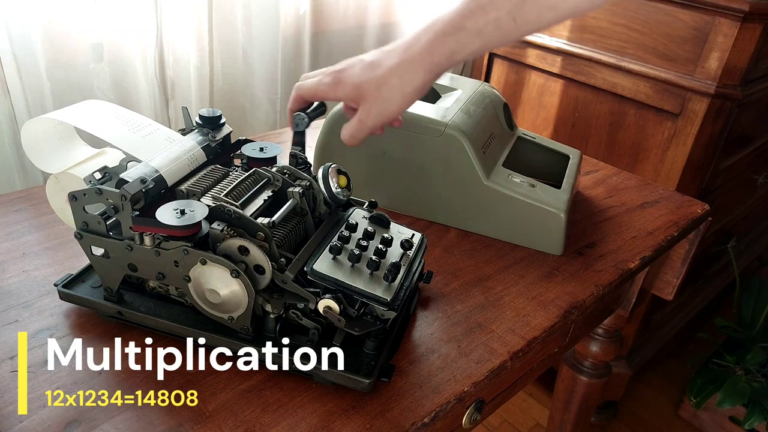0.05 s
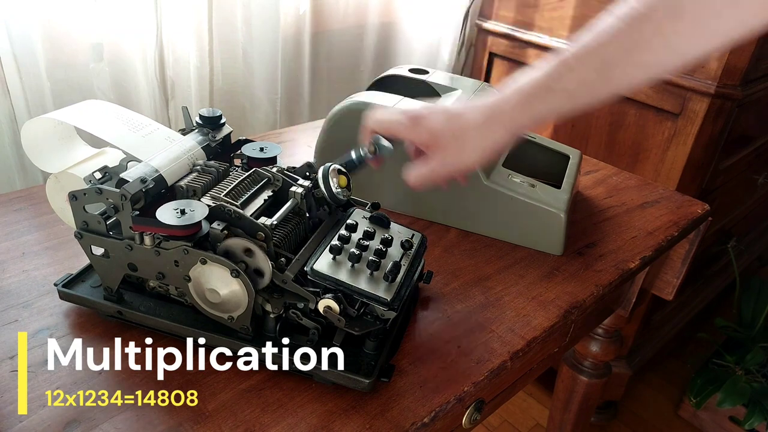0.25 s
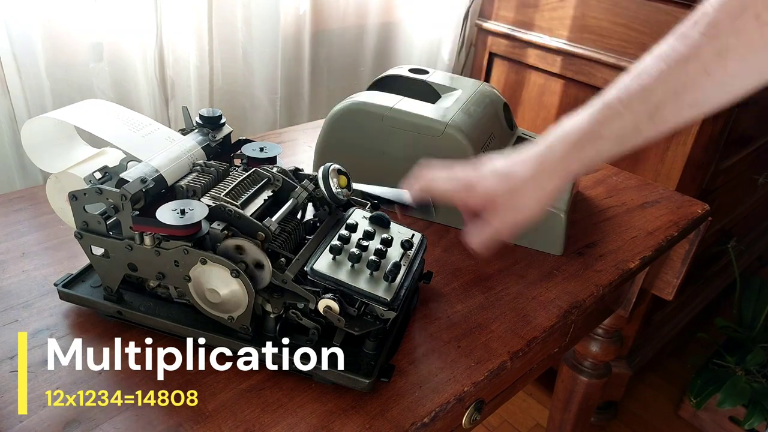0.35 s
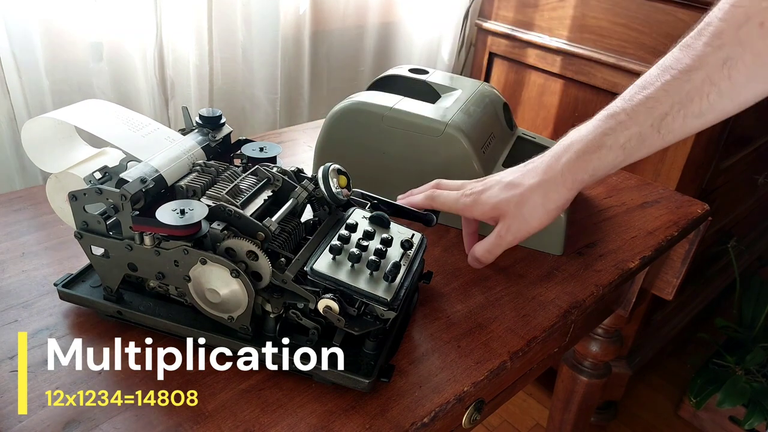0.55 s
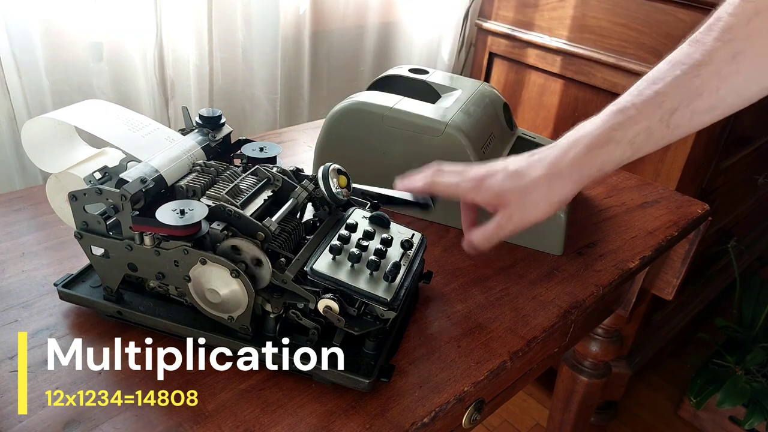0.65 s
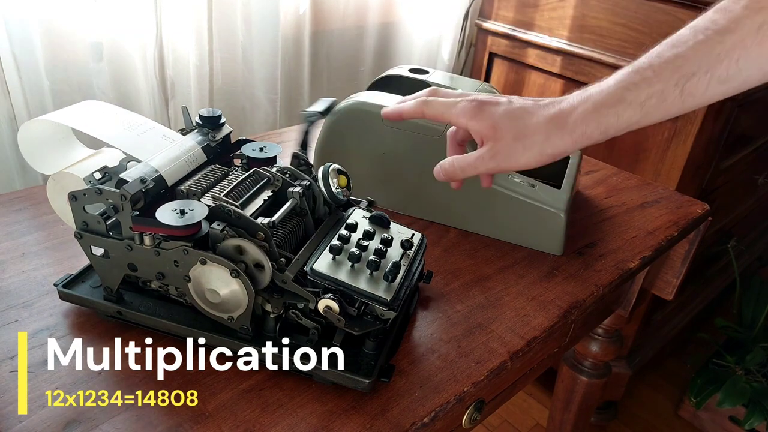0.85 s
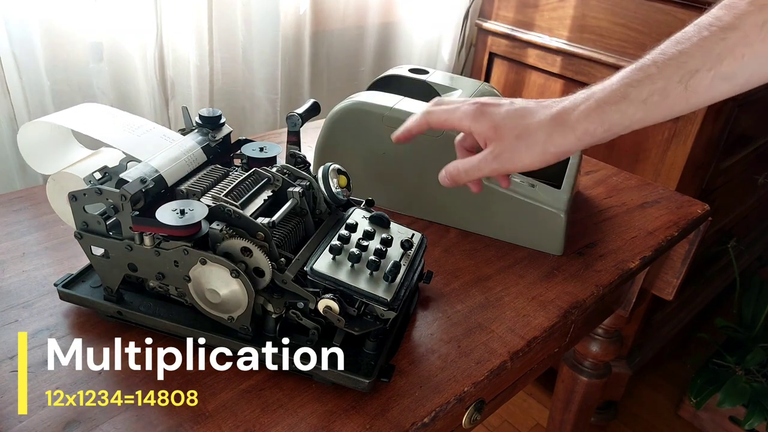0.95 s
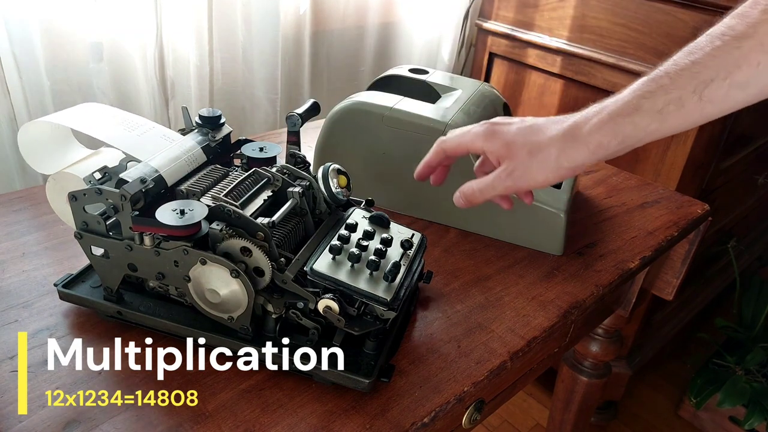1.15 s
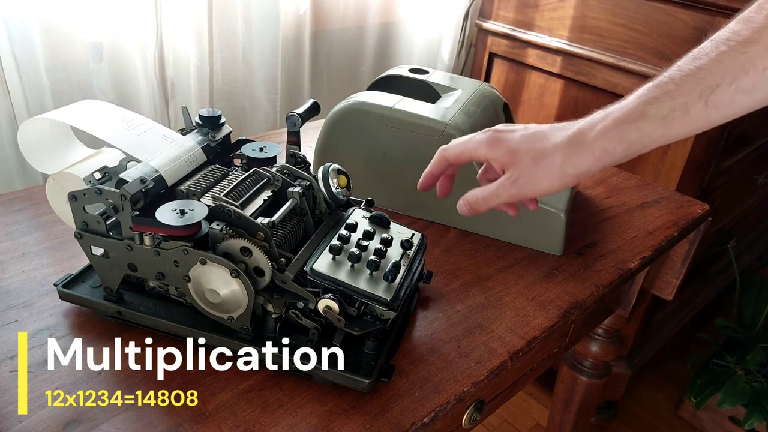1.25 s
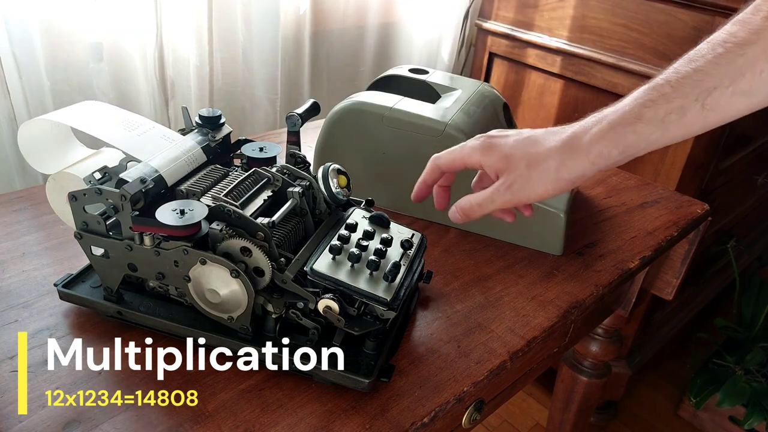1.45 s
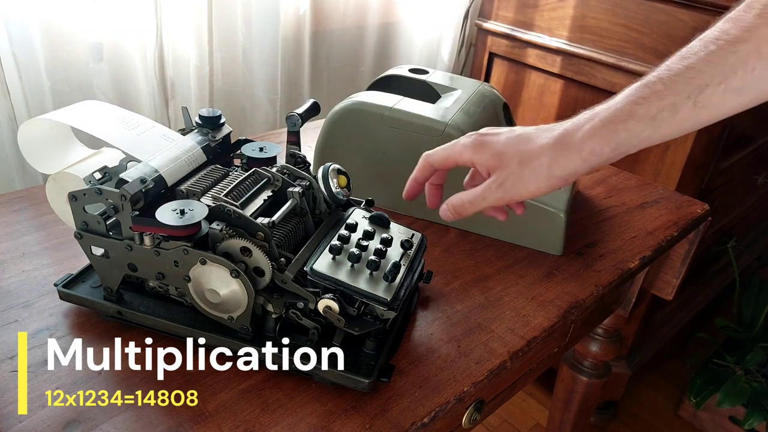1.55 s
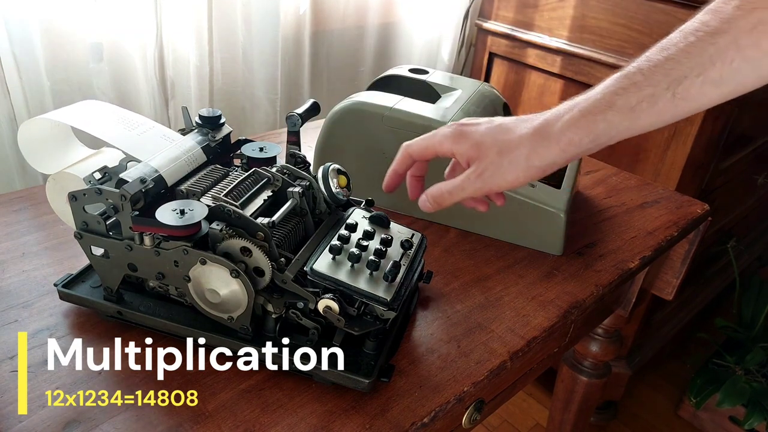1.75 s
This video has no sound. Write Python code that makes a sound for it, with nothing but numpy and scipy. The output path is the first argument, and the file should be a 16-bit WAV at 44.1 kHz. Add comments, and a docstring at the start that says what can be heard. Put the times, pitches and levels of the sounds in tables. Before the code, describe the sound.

A mechanical calculator, slightly left in a small room, ratchets loudly from about 0.2 seconds as its lever is pulled, gears rattling until a steel clunk thumps the wooden table near 0.5 seconds. From 0.75 seconds the lever springs back with more clicking and clatter, knocking home around 1 second. A spring quivers faintly after each stroke, and only quiet room hiss remains from about 1.5 seconds.

```python
"""A pawl clicks over its ratchet as the lever of an uncovered mechanical calculator is pulled to its stop
and springs back. Racks and gears rattle, links clack, steel parts knock home and thump the table.
After each stroke a spring quivers faintly over the quiet hiss of the room.
The machine stands on a wooden table in a small room, a little left of a stereo microphone pair."""
import sys
import numpy as np
from scipy import signal
from scipy.fft import rfft, irfft, next_fast_len
from scipy.io import wavfile

SR = 44100
rng = np.random.default_rng(int(sys.argv[2]) if len(sys.argv) > 2 else 0)


def log_audio(samples):
    """Write samples as a 16-bit WAV file to the path given in sys.argv[1]."""
    # one column per channel
    frames = np.atleast_2d(samples).T
    # limit to full scale, then quantise
    limited = np.clip(frames, -1, 1)
    pcm = np.round(limited * 32767).astype(np.int16)
    wavfile.write(sys.argv[1], SR, pcm)


N = 79380


def amp(db):
    """Decibels to gain."""
    return 10 ** (np.asarray(db) / 20)


def unit(x):
    """Scale to rms 1."""
    return x / np.sqrt(np.mean(x ** 2) + 1e-20)


def along(points, hz):
    """Read (Hz, value) points on a log frequency axis."""
    f, v = np.transpose(points)
    return np.interp(np.log(hz + 1), np.log(f + 1), v)


def bell(x, centre, width):
    """A Gaussian curve of height 1."""
    return np.exp(-.5 * ((x - centre) / width) ** 2)


def fade(t, t60):
    """Free decay, 60 dB down after t60 seconds."""
    return np.exp(-np.log(1000) * t / t60)


def filtered(x, response):
    """Filter x by a gain given as a function of Hz."""
    size = next_fast_len(x.shape[-1] + 8192)
    return irfft(rfft(x, size) * response(np.fft.rfftfreq(size, 1 / SR)), size)[..., :x.shape[-1]]


def add(out, start, sound):
    """Mix a sound in at start seconds."""
    part = out[:, max(0, round(start * SR)):][:, :sound.shape[-1]]
    part += sound[..., :part.shape[1]]


# Likeness of the two microphones. Each row: frequency in Hz, correlation.
MIC_LIKENESS = [(30, .3), (110, 1), (300, 0.73), (1000, .15), (3000, 0.14), (12000, 0.083)]
def paired(x):
    """Two unrelated signals as the microphone pair hears them: most alike in the bass."""
    def mid_side_gains(hz):
        angle = np.arccos(np.clip(along(MIC_LIKENESS, hz), -1, 1)) / 2
        return np.array([np.cos(angle), np.sin(angle)])
    mid, side = filtered(x, mid_side_gains)
    return np.array([mid + side, mid - side])


def coloured_noise(length, spectrum, envelope=1):
    """Stereo noise of rms 1, shaped by an envelope and then by a (Hz, dB) spectrum."""
    noise = paired(envelope * rng.standard_normal((2, length)))
    return unit(filtered(noise, lambda hz: amp(along(spectrum, hz))))


# Room tone around the microphones. Each row: frequency in Hz, relative level in dB.
AIR_SPECTRUM = [(25, -16), (48, -8), (120, -5), (165, -11), (330, -13.5), (480, -17), (700, -25.5),
                (900, -20.5), (1300, -28.5), (2000, -22.5), (3900, -44), (16000, -49)]
# A narrow hiss that swells and sinks. Each row: time in seconds, level in dB.
HISS_LEVELS = [(0, -64), (.2, -54.5), (.7, -60.5), (1.2, -69.5), (1.8, -67)]
# Steady tones in the room. Each row: frequency in Hz, level in dB.
ROOM_TONES = [(129, -76), (900, -88), (2476, -80)]
def background(air_db=-67.5, air_left_db=5.5, hiss_hz=2450, hiss_width_hz=303):
    """Quiet room noise, stronger on the left, with a band of hiss and three faint tones."""
    t = np.arange(N) / SR
    air = amp(air_db + air_left_db * np.array([[.5], [-.5]])) * coloured_noise(N, AIR_SPECTRUM)
    hiss = unit(filtered(rng.standard_normal((2, N)), lambda hz: bell(hz, hiss_hz, hiss_width_hz)))
    hiss *= amp(np.interp(t, *np.transpose(HISS_LEVELS)))
    tones = sum(amp(db) * np.sqrt(2) * np.sin(2 * np.pi * (hz * t + rng.random()))
                for hz, db in ROOM_TONES)
    return air + hiss + tones


# Decay of the small room. Each row: frequency in Hz, t60 in seconds.
ROOM_DECAY = [(80, .42), (250, .42), (600, .52), (1500, .42), (4000, .35), (9000, .3), (12500, .26),
              (16000, .19)]
# Reverberation at the microphones. Each row: frequency in Hz, gain in dB.
ROOM_GAIN = [(60, 9), (200, -1), (1000, -5.5), (4000, -4), (9000, -8), (14000, -4.5)]
def room(x, build_s=.0025):
    """Reflections off the nearby walls build quickly and die sooner in the treble."""
    hz, t, noise = signal.stft(paired(rng.standard_normal((2, SR * 3 // 4))), SR, nperseg=256)
    shape = fade(t, along(ROOM_DECAY, hz)[:, None]) * (1 - np.exp(-(t / build_s) ** 2))
    shape /= np.sqrt((shape ** 2).sum(1, keepdims=True) * t[1] * SR)  # equal energy in every band
    tail = signal.istft(noise * shape * amp(along(ROOM_GAIN, hz))[:, None], SR, nperseg=256)[1]
    return signal.fftconvolve(x, tail, axes=1)[:, :N]


# The spring after each stroke. Each row: time of the first pulse in seconds, level in dB.
SPRING_QUIVERS = [(0.654, -57), (1.108, -61.5)]
def spring(pulses=5, period_s=.086, width_s=.016, loss_db=1.6, hum_hz=630, width_hz=80):
    """A spring swings to and fro, humming in ever weaker pulses."""
    t = np.arange(N) / SR
    swell = sum(amp(db - loss_db * k) * bell(t, first + k * period_s, width_s)
                for first, db in SPRING_QUIVERS for k in range(pulses))
    hum = filtered(paired(rng.standard_normal((2, N))), lambda hz: bell(hz, hum_hz, width_hz))
    return swell * unit(hum)


# Modes of the table top and base plate. Each row: frequency in Hz, level in dB, t60 in seconds.
TABLE_MODES = [(176, -2, .22), (241, -7, .22), (297, 0, .22), (401, -2, .26), (440, -8, .26),
               (486, -10, .3), (602, -11, .28)]
def table_ring(t):
    """The wooden table rings in its modes after one push."""
    return sum(amp(db) * fade(t, t60) * np.sin(2 * np.pi * hz * t) for hz, db, t60 in TABLE_MODES)


# Weight shifting on the table. Each row: start in seconds, thud level in dB, table ring level in dB.
TABLE_THUMPS = [(0.277, -45, -41), (0.319, -60, -52.5), (0.456, -24.5, -45.5), (.487, -29.5, -42.5),
                (0.511, -52.5, -38), (.768, -39.5, -46), (.86, -43, -40.5), (.96, -53.5, -40),
                (0.999, -51, -54), (1.031, -40, -44)]
def thumps(attack_s=.005, thud_hz=76.2, thud_t60=.13):
    """The heavy machine rocks with a deep thud and sets the table ringing."""
    out, t = np.zeros((2, N)), np.arange(SR // 2) / SR
    onset = 1 - np.exp(-t / attack_s)
    thud = fade(t, thud_t60) * np.sin(2 * np.pi * thud_hz * t)
    for start, thud_db, ring_db in TABLE_THUMPS:
        add(out, start, onset * (amp(thud_db) * thud + amp(ring_db) * table_ring(t)))
    return out


# Clacks and pings of the linkage. Each row: start in seconds, pitch in Hz, level in dB.
LINK_CLACKS = [(0.349, 1027, -32), (.418, 930, -32.5), (.451, 5076, -21), (.452, 1028, -29.5),
               (.806, 916, -30.5), (.888, 952, -28), (.962, 997, -27)]
def clacks(attack_s=.00091, t60=.034):
    """A link takes up its play and rings briefly."""
    out, t = np.zeros((2, N)), np.arange(SR // 4) / SR
    shape = (1 - np.exp(-t / attack_s)) * fade(t, t60)
    for start, hz, db in LINK_CLACKS:
        add(out, start, amp(db) * shape * np.sin(2 * np.pi * (hz * t + rng.random())))
    return out


# The lever's two strokes. Each row: time in seconds, gear rattle in dB, frame rumble in dB.
PULL_STROKE = [(0, -70, -67), (.155, -65, -61), (.172, -56, -56), (.21, -60.5, -63.5), (.22, -43.5, -53.5),
               (.26, -41.5, -53), (.285, -37, -44.5), (.44, -37, -45.5), (.468, -29, -35), (.5, -41, -42),
               (.56, -69.5, -45)]
RETURN_STROKE = [(.68, -73.5, -55), (.738, -55.5, -67), (.758, -43, -54), (.77, -39.5, -42.5),
                 (.86, -37, -46.5), (.925, -39, -45), (.952, -38.5, -46.5), (.966, -31.5, -31.5),
                 (1.0, -41.5, -46), (1.07, -89, -64)]
# Gears and frame at the microphones. Each row: frequency in Hz, relative level in dB.
RATTLE_SPECTRUM = [(300, -15.5), (700, -6), (1000, 5.5), (1450, 5.5), (2500, 8), (5300, 7), (6500, 2),
                   (10500, 0), (12800, -5), (15400, -23), (16400, -22.5)]
RUMBLE_SPECTRUM = [(25, -21), (60, -7), (100, -3), (140, -7), (180, -3), (310, -3), (430, -4), (550, -10),
                   (950, -9), (1500, -24), (4000, -50)]
def gears(stroke, contacts_per_s=900, spread_db=3.5, contact_t60=.0076, shake_db=-5):
    """Racks and wheels chatter in countless tiny contacts; the frame rumbles and shakes the table."""
    times, rattle_db, rumble_db = np.transpose(stroke)
    t = np.arange(N) / SR
    moving = (t >= times[0]) & (t <= times[-1])
    rattle_gain = moving * amp(np.interp(t, times, rattle_db))
    rumble_gain = moving * amp(np.interp(t, times, rumble_db))
    touches = rng.random(N) < contacts_per_s / SR
    contacts = touches * amp(spread_db * np.clip(rng.standard_normal(N), -2, 2))
    # overlapping contacts add in power
    power = signal.fftconvolve(contacts ** 2, fade(t[:SR // 20], contact_t60) ** 2)[:N]
    rattle = rattle_gain * coloured_noise(N, RATTLE_SPECTRUM, envelope=np.sqrt(np.abs(power)))
    ring = table_ring(t[:SR // 2])
    shake = signal.fftconvolve(rumble_gain * rng.standard_normal(N), ring / np.linalg.norm(ring))[:N]
    rumble = rumble_gain * coloured_noise(N, RUMBLE_SPECTRUM)
    return rattle + amp(shake_db) * shake + rumble


# Steel parts meeting their stops. Each row: start in seconds, level in dB.
STEEL_KNOCKS = [(0.0177, -63), (.0877, -74), (.1685, -44), (0.2161, -23.5), (.2705, -27), (.278, -31.5),
                (0.3362, -21.5), (0.352, -33), (.4335, -20), (0.4505, -16), (0.4619, -25), (0.4688, -21),
                (0.4754, -23.5), (0.4782, -16.5), (.4915, -26), (0.6823, -52), (.695, -60.5), (0.7453, -44),
                (0.7639, -35), (.823, -20.5), (.852, -27.5), (0.9491, -31), (.9587, -22.5), (.9635, -21.5),
                (.9695, -26.5), (.982, -38)]
# The crack of a blow. Each row: frequency in Hz, relative level in dB.
CRACK_SPECTRUM = [(100, -4.5), (500, -19), (1500, 0), (3000, -2), (5200, 3.5), (6500, 4), (8500, 5.5),
                  (10500, 3.5), (13000, 10), (15500, 3), (16500, -34.5)]
# Modes of the steel frame and levers. Each row: frequency in Hz, level in dB, t60 in seconds.
STEEL_MODES = [(2175, -11, .4), (2923, -9, .3), (3191, -6, .22), (3290, -7, .22), (3614, -1, .16),
               (4274, -7, .22), (5025, 1, .13), (5315, 2, .15), (7058, -4, .14), (9791, -2, .11),
               (10562, -2, .11), (12689, 0, .13), (14123, 0, .1), (15023, 0, .09)]
def knocks(attack_s=.0001, crack_t60=.033, ring_db=-27, spread_db=1.4):
    """Steel hits its stop with a broad crack, then rings on, differently for each blow."""
    out, t = np.zeros((2, N)), np.arange(SR // 2) / SR
    onset = 1 - np.exp(-t / attack_s)
    for start, db in STEEL_KNOCKS:
        crack = fade(t, crack_t60) * coloured_noise(len(t), CRACK_SPECTRUM)
        ring = np.zeros_like(crack)
        for hz, mode_db, t60 in STEEL_MODES:
            gain = amp(mode_db + spread_db * rng.standard_normal((2, 1)))
            ring += gain * fade(t, t60) * np.sin(2 * np.pi * (hz * t + rng.random((2, 1))))
        add(out, start, amp(db) * onset * (crack + amp(ring_db) * ring))
    return out


# The pawl dropping over the ratchet's teeth. Each row: start in seconds, level in dB.
PAWL_CLICKS = [(0.1274, -44.5), (0.2144, -21.5), (0.224, -16), (0.2448, -15.5), (0.2927, -12),
               (0.333, -13.5), (0.3755, -11.5), (0.41, -10), (0.4324, -15), (0.7223, -43.5),
               (0.7817, -15.5), (0.8111, -16.5), (0.824, -13), (0.8394, -16), (0.85, -14.5), (0.869, -15.5),
               (0.902, -18.5), (0.9345, -16)]
# Its snap, with no cover between it and the microphones. Each row: frequency in Hz, relative level in dB.
SNAP_SPECTRUM = [(200, -35.5), (1500, -36), (3500, -15.5), (7000, -3), (10500, -3.5), (13000, 7.5),
                 (15200, 7), (16500, -49)]
def pawl(gain_db=-1.5, attack_s=.0003, snap_t60=.01, scatter_db=-13, scatter_t60=.04):
    """Each tooth gives a short bright snap that scatters briefly through the works."""
    out, t = np.zeros((2, N)), np.arange(SR // 8) / SR
    onset = 1 - np.exp(-(t / attack_s) ** 2)
    decay = np.hypot(fade(t, snap_t60), amp(scatter_db) * fade(t, scatter_t60))
    for start, db in PAWL_CLICKS:
        add(out, start, amp(db + gain_db) * onset * decay * coloured_noise(len(t), SNAP_SPECTRUM))
    return out


# Balance at the microphone pair. Each row: frequency in Hz, left over right in dB.
LEFT_BALANCE = [(30, 1.5), (120, 3), (500, -0.2), (2000, 2.5), (8000, 4.5), (13000, 2.5)]
def scene(left_lead_s=.0002):
    """The calculator in its room, a little nearer the left microphone, which hears it first."""
    machine = pawl() + knocks() + gears(PULL_STROKE) + gears(RETURN_STROKE)
    sound = machine + room(machine) + clacks() + thumps() + spring() + background()
    side = np.array([[.5], [-.5]])
    def placement(hz):
        return amp(along(LEFT_BALANCE, hz) * side) * np.exp(2j * np.pi * hz * left_lead_s * side)
    return filtered(sound, placement)


def record(dry, top_hz=16600):
    """Both channels are cut off above the band limit."""
    return filtered(dry, lambda hz: hz < top_hz)


dry = scene()
out = record(dry)
log_audio(out)
```